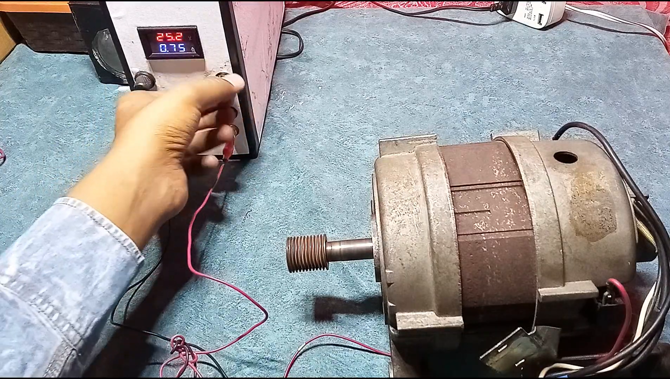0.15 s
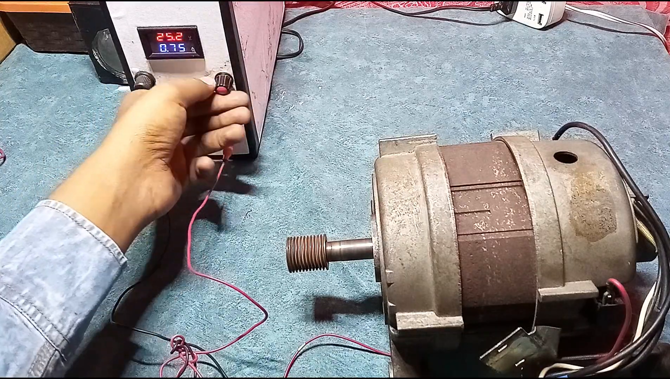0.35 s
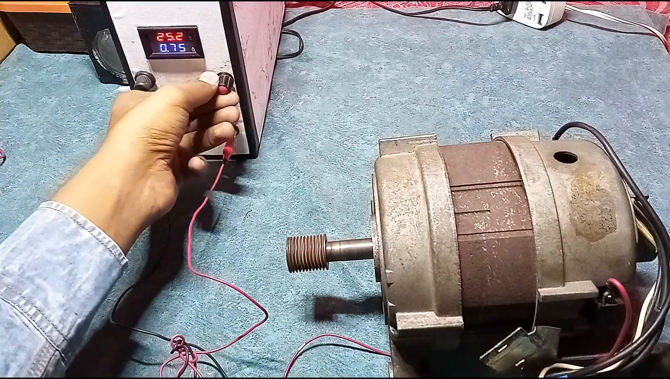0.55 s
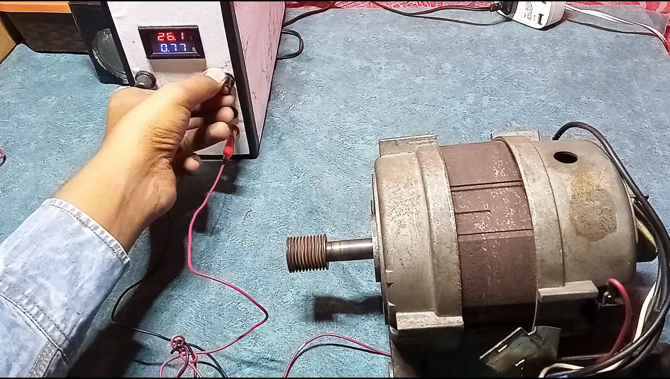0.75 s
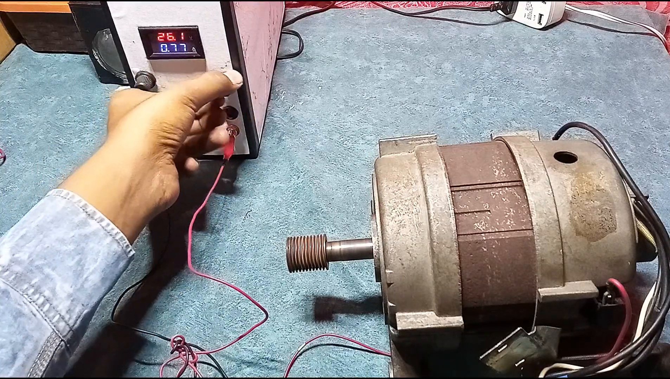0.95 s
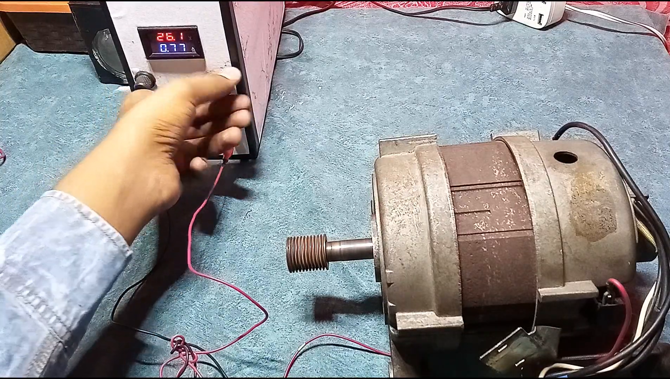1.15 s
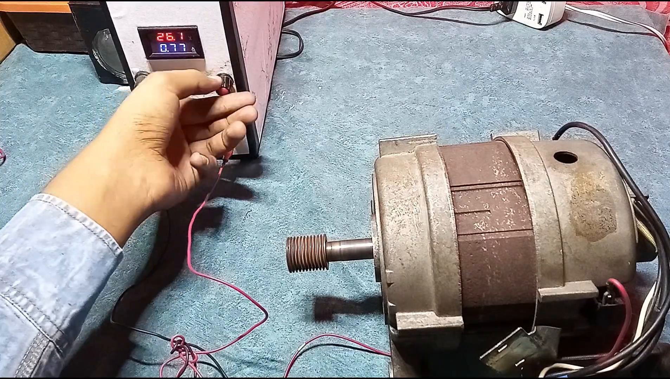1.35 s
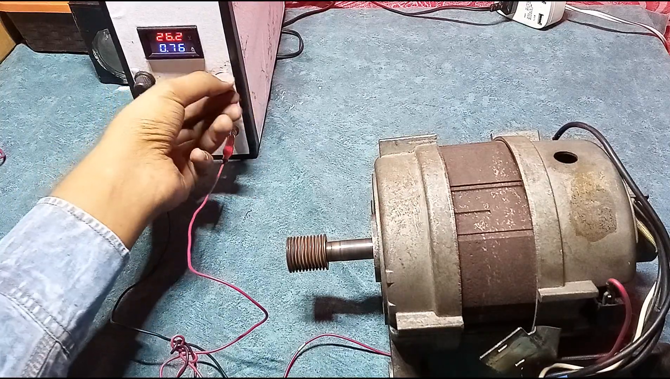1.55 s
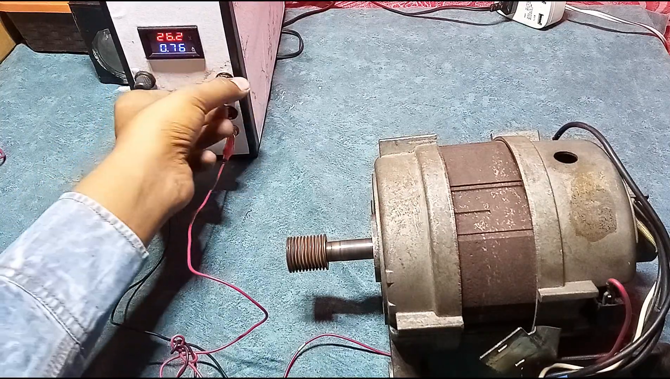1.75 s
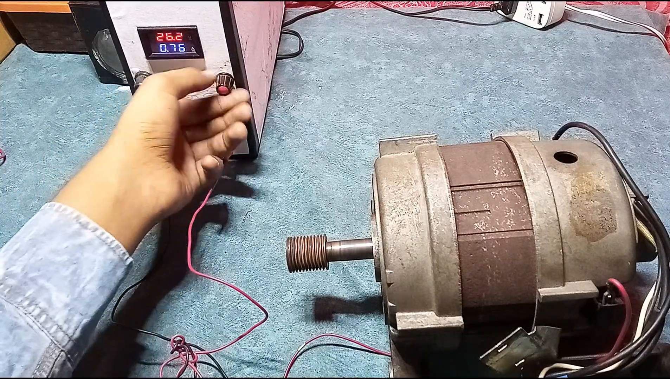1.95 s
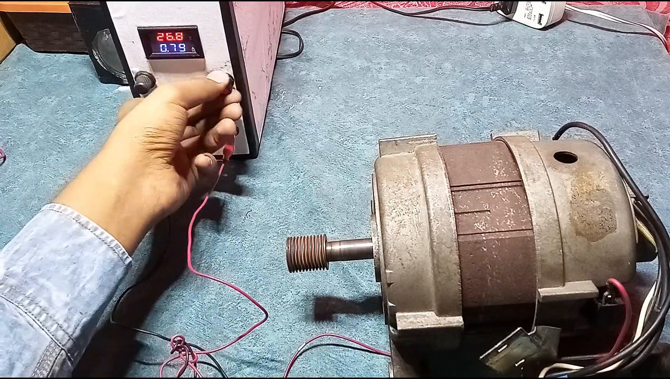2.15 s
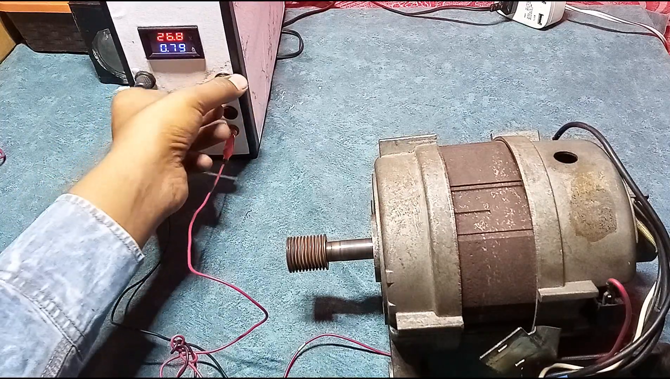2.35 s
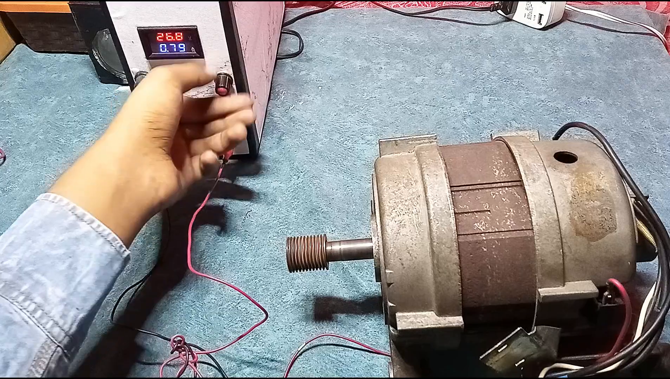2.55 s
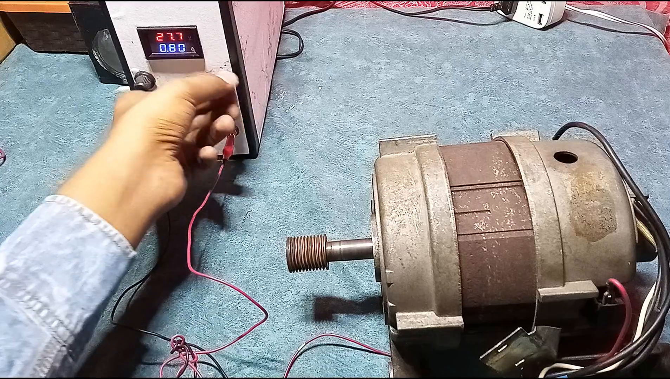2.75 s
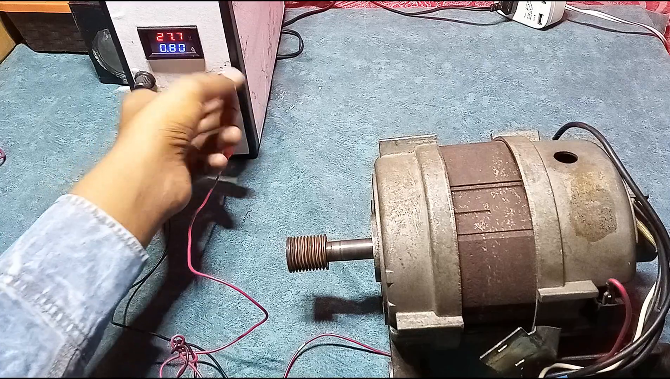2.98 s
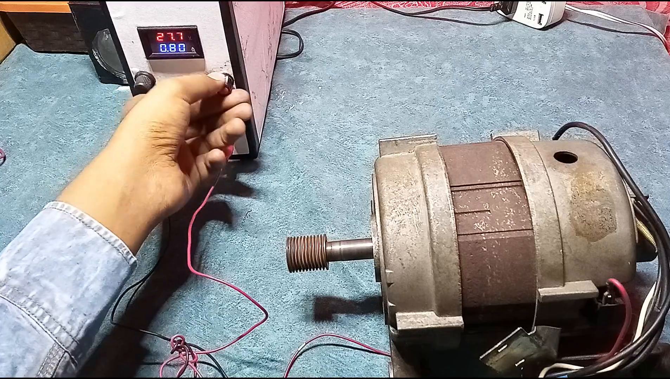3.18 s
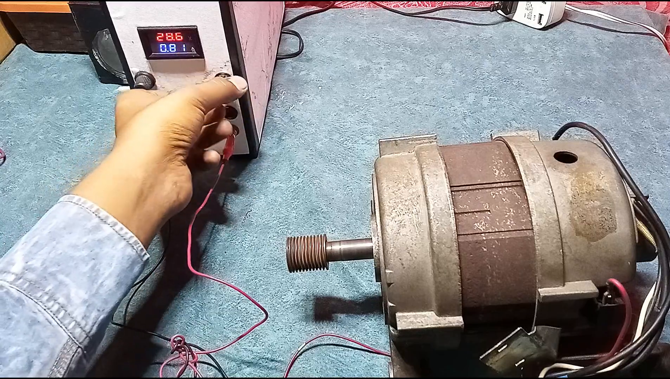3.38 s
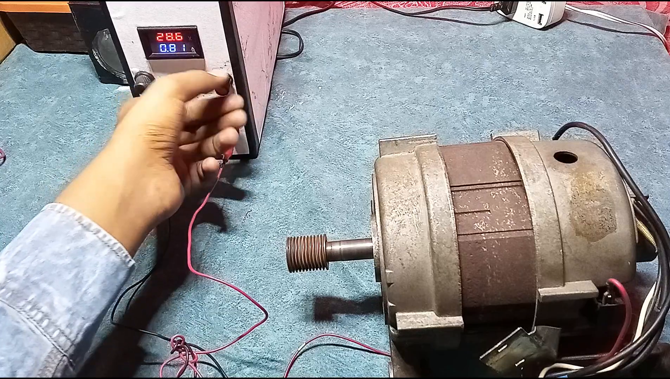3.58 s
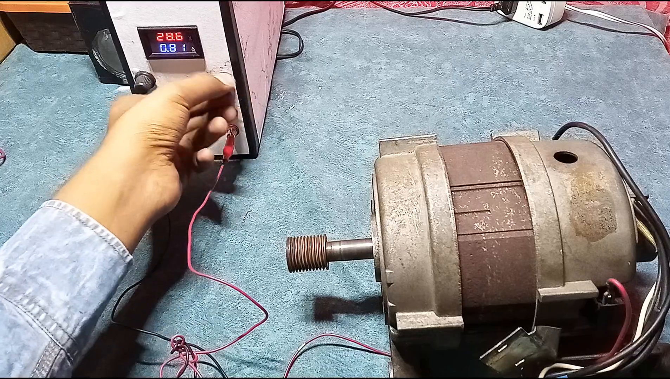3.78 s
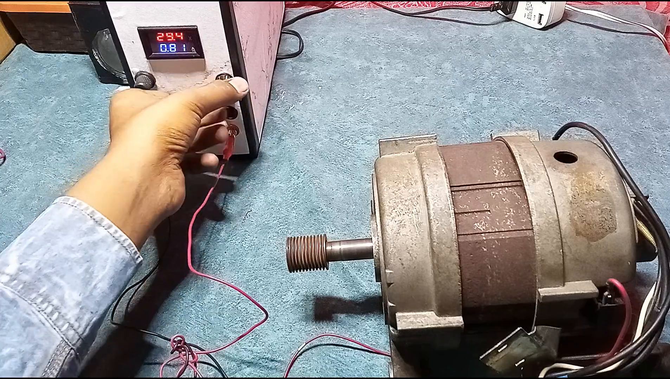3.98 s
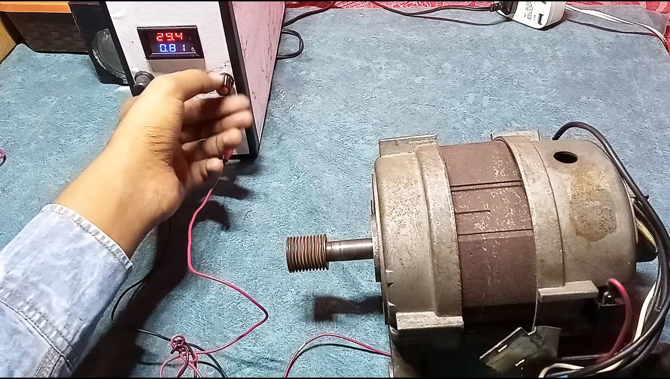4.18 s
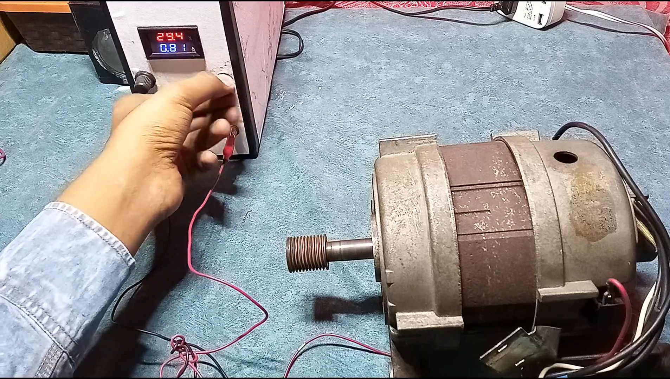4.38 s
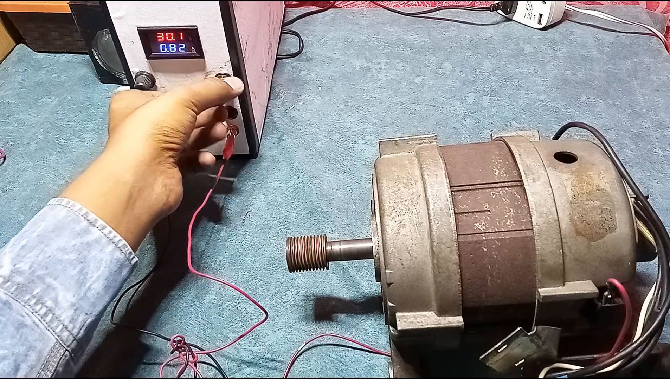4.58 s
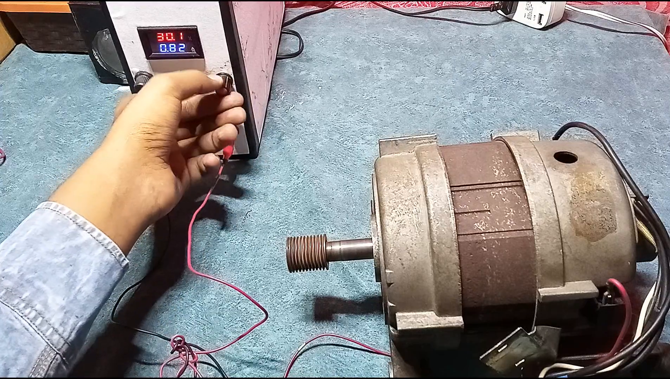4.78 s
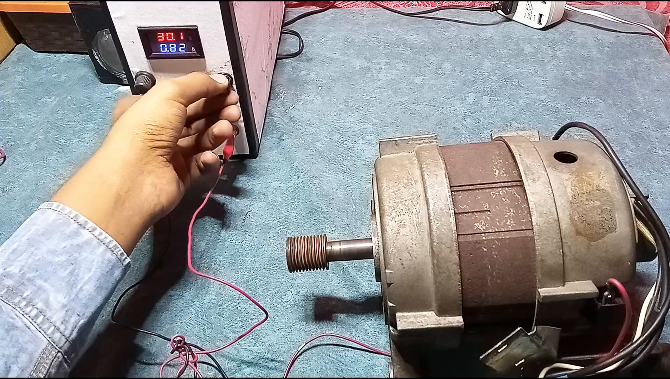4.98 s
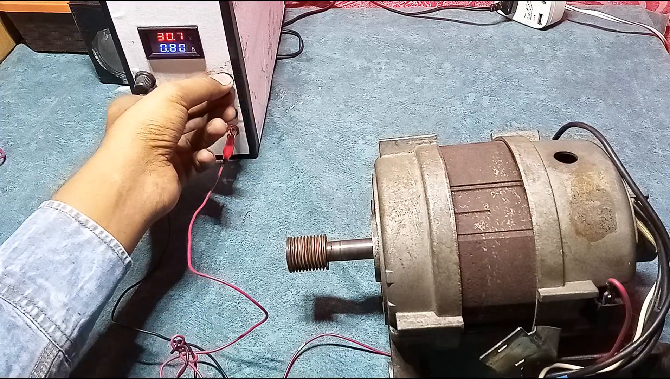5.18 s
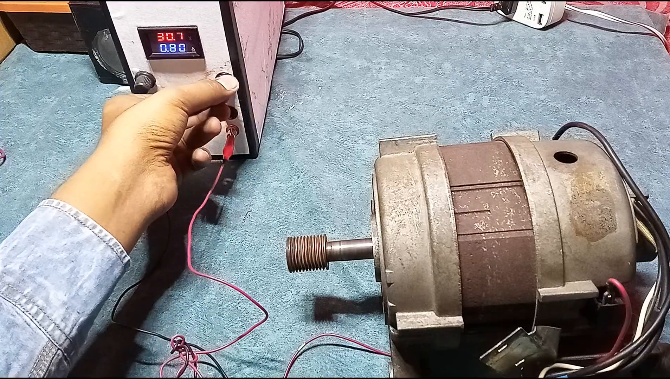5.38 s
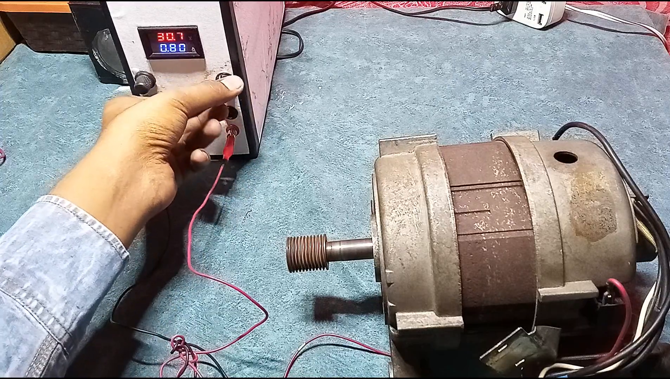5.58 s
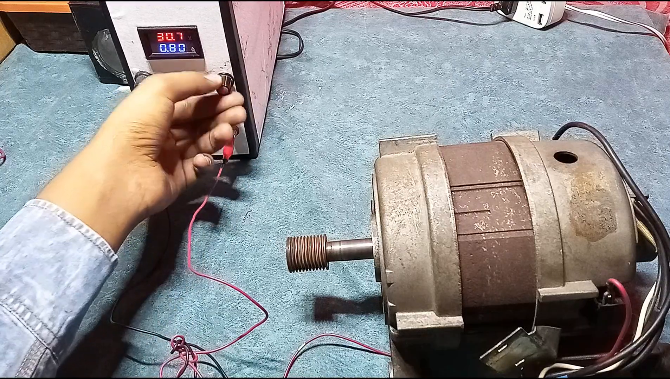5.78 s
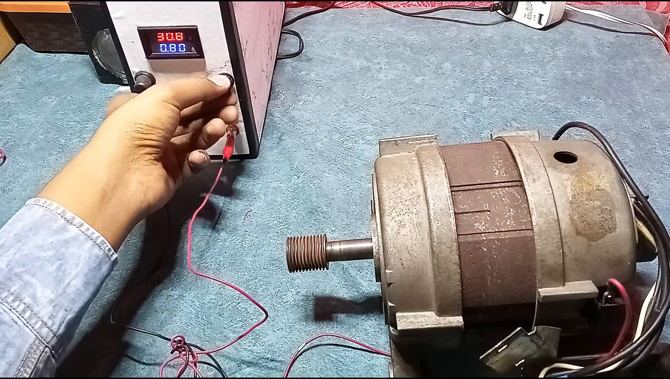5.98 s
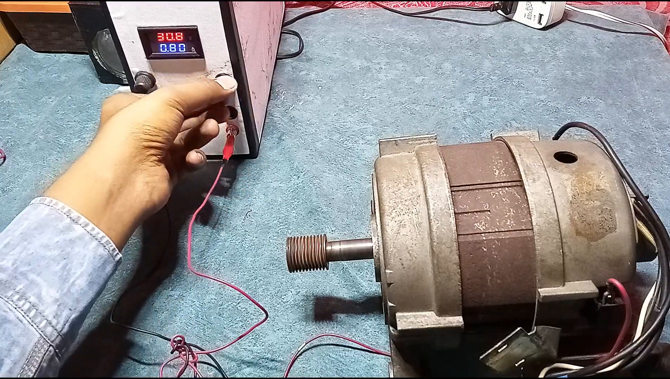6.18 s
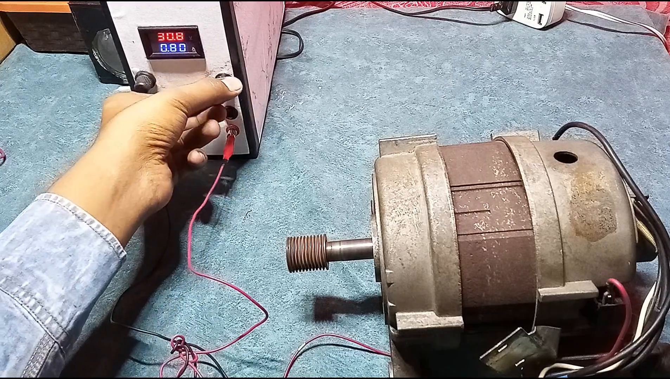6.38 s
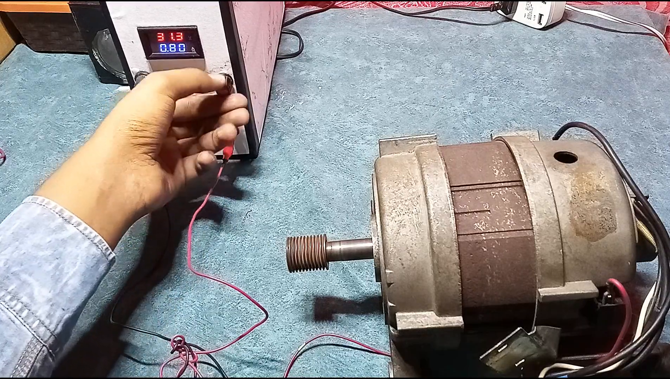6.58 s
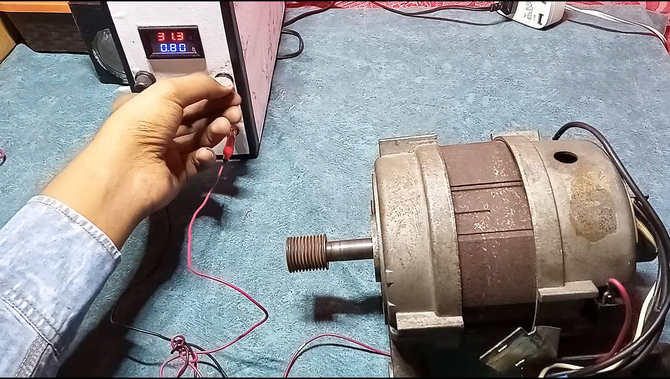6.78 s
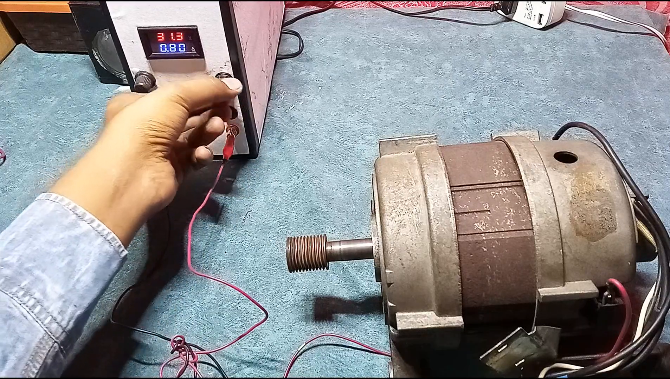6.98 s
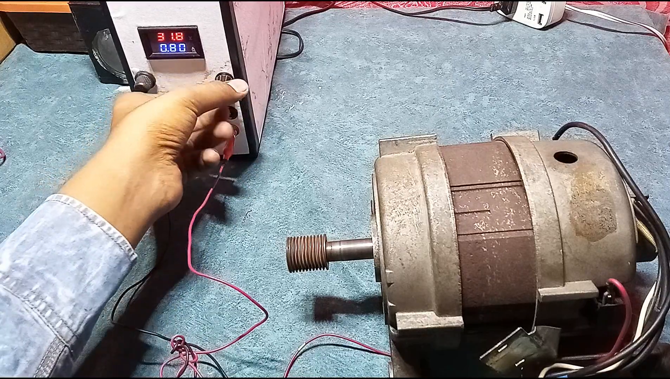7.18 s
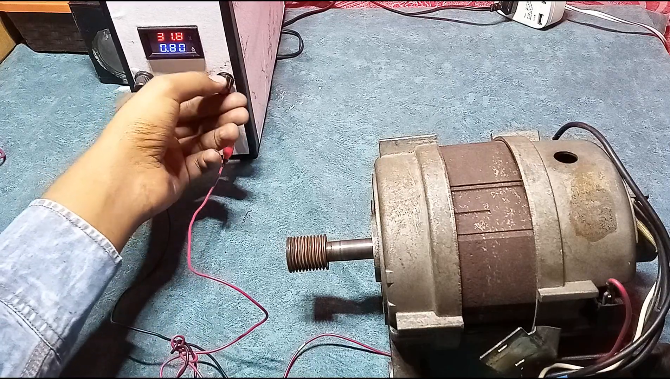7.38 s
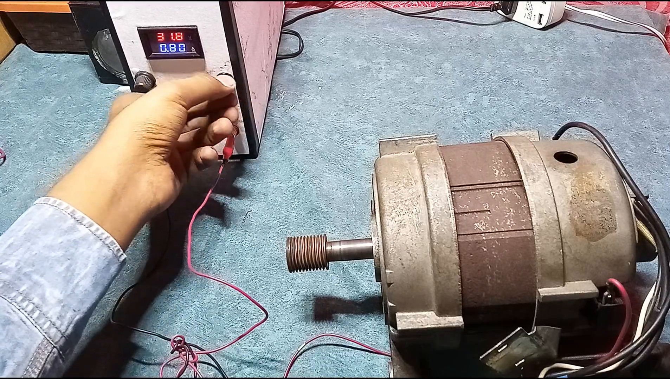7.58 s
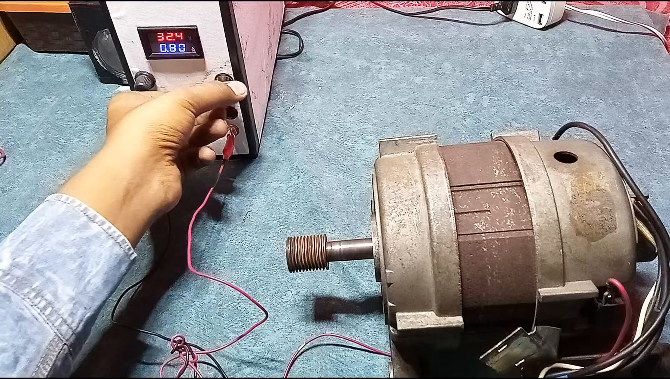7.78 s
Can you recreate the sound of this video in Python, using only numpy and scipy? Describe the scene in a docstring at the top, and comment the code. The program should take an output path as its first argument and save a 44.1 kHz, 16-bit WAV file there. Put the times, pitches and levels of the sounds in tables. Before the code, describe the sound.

A thin whine of several tones comes from a small electric motor running freely on a bench, already spinning at the start. The pitch creeps upward as it gathers speed, joined by a fluttering brush hiss and a high, gritty bearing rattle. The room rumbles faintly behind it. Near the end everything stops dead, with no winding down.

```python
"""A thin whine climbs slowly in pitch: a small brush motor runs unloaded on a cloth-covered bench
while its supply voltage is turned up. Commutator bars and bearing balls sing at fixed multiples of
the shaft speed through the resonances of the cast frame. The brushes hiss, the dry bearing rattles
near 7 kHz and the room rumbles faintly, until the sound is cut off abruptly."""
import sys
import numpy as np
from scipy import signal
from scipy.fft import rfft, irfft
from scipy.io import wavfile

SR = 44100
rng = np.random.default_rng(int(sys.argv[2]) if len(sys.argv) > 2 else 0)


def generate_wav(signal):
    """Clip the signal to [-1, 1] and save it as 16-bit WAV at the path in sys.argv[1]."""
    frames = np.transpose(np.atleast_2d(signal))
    scaled = np.clip(frames, -1, 1) * 32767
    pcm = np.round(scaled).astype(np.int16)
    wavfile.write(sys.argv[1], SR, pcm)


N = 345744
TIME = np.arange(N) / SR
BIN_HZ = np.maximum(np.arange(N // 2 + 1) * SR / N, 1)


def from_db(db):
    """Decibels to gain."""
    return 10 ** (np.asarray(db) / 20)


def unit_rms(x):
    """Scale to unit rms."""
    return x / np.sqrt(np.mean(x ** 2) + 1e-20)


def automation(rows):
    """One curve per value column of a timed table, at every sample."""
    times, *columns = np.transpose(rows)
    return [np.interp(TIME, times, column) for column in columns]


def eq_curve(points):
    """Gain at every frequency bin from (freq_hz, gain_db) points."""
    hz, db = np.transpose(points)
    return from_db(np.interp(np.log(BIN_HZ), np.log(hz), db))


def resonance(hz, width_hz, db=0):
    """Gain of one steep-sided resonance at every frequency bin."""
    return from_db(db) / (1 + (2 * (BIN_HZ - hz) / width_hz) ** 2)


def filtered(x, gain):
    """Filter by a gain per frequency bin."""
    return irfft(rfft(x) * gain, N)


def drift(rate_hz):
    """Random wander with spread 1."""
    knots = rng.standard_normal(1024)
    return np.interp(TIME * rate_hz, np.arange(len(knots)), knots, period=len(knots)) * np.sqrt(3 / 2)


# Tone colour of the room rumble: freq_hz, gain_db
RUMBLE_EQ = [(15, -42), (30, -34), (45, -22), (58, -12), (82, -10), (100, 2.5), (120, -1), (150, -3.5),
             (200, -4.5), (260, -5.5), (320, -18), (420, -31)]
# Fader for the rumble bed between booms: time_s, level_db
RUMBLE_FADER = [(0, -70.5), (1.8, -69), (3, -72), (4.3, -71), (5.3, -69), (7.25, -70.5)]
# Soft booms, where the rumble and a room mode swell: start_s, length_s, gain_db
BOOMS = [(0.218, 0.038, -63.5), (0.439, 0.044, -67.5), (1.425, 0.046, -65), (1.786, 0.08, -61),
         (1.984, 0.25, -62.5), (2.494, 0.064, -61), (2.822, 0.04, -65), (3.546, 0.05, -63.5),
         (4.614, 0.072, -62), (4.925, 0.054, -66.5), (5.033, 0.056, -65), (5.3, 0.048, -62),
         (5.48, 0.108, -63.5), (5.845, 0.054, -63), (6.226, 0.134, -58.5), (6.415, 0.054, -60),
         (6.549, 0.076, -62.5), (7.226, 0.03, -67)]

def room_rumble(lumpy_db, swell_db, boom_db, mode_rest_db, fade_s):
    """Lumpy low noise and one room mode; both rise with each boom."""
    booms = np.zeros(N)
    for start, length, db in BOOMS:
        corners_s = [start - fade_s, start + length / 2, start + length + fade_s]
        booms += from_db(db) * np.interp(TIME, corners_s, [0, 1, 0])
    low_noise = unit_rms(filtered(rng.standard_normal(N), eq_curve(RUMBLE_EQ)))
    mode = unit_rms(filtered(rng.standard_normal(N), resonance(hz=165.5, width_hz=17)))
    steady_mode = unit_rms(np.cos(np.angle(signal.hilbert(mode))))  # envelope flattened
    bed_db = automation(RUMBLE_FADER)[0] + lumpy_db * drift(12)
    bed = from_db(bed_db) * low_noise + from_db(mode_rest_db) * mode
    return bed + booms * (from_db(swell_db) * low_noise + from_db(boom_db) * steady_mode)


# Body resonances of the cast frame and its end shields: centre_hz, width_hz, gain_db
FRAME_MODES = [(382, 160, -30.5), (514.4, 53, -18.5), (610, 91, -17.5), (694, 270, -26.5), (787.5, 47, -18),
               (1021, 124, -20), (1415, 100, -30), (1610, 126, -15.5), (1780, 130, -12.5),
               (1850, 90, -10.5), (2147, 440, -19), (2520, 270, -19), (2548, 120, -14.5), (2728, 130, -12),
               (2870, 170, -13), (3080, 120, -12), (3228, 132, -5), (3350, 110, -6.5), (3594, 260, -14.5),
               (3973, 75, -14.5), (4353, 1200, -15.5), (5383, 190, -14), (6340, 2600, -15.5),
               (6660, 176, -9.5), (7036, 514, -0.5), (7440, 430, -13), (8280, 1600, -15), (9730, 1700, -15),
               (12400, 2600, -27), (15024, 870, -17.5)]

def frame_response(rugged_db, spacing_hz):
    """The frame's main resonances; in the treble, countless small modes make the response rugged."""
    body = np.sqrt(sum(resonance(*mode) ** 2 for mode in FRAME_MODES))
    centres_hz = np.arange(0, SR / 2, spacing_hz)
    ripple = np.interp(BIN_HZ, centres_hz, rng.standard_normal(len(centres_hz)))
    depth_db = rugged_db * np.interp(BIN_HZ, [3500, 5000, 7000, 8500], [0, .7, .3, 1])
    return body * from_db(depth_db * ripple)


# Colour of the brush friction going into the frame: freq_hz, gain_db
HISS_EQ = [(300, 3.5), (600, -9.5), (1100, 2), (1800, -5.5), (2500, -4.5), (3200, -4.5), (4500, 3),
           (6000, -2.5), (7000, -5.5), (8500, 3.5), (12000, 0), (15500, 3.5)]

def brush_hiss(frame, chatter_db):
    """Carbon sliding on copper: hiss that flutters with the contact."""
    sliding = rng.standard_normal(N) * from_db(chatter_db * drift(900))
    return unit_rms(filtered(sliding, frame * eq_curve(HISS_EQ)))


def rough_ring(turns, bumps):
    """A rough ring passing a contact: the same random profile returns on every turn."""
    profile = signal.resample(rng.standard_normal(bumps), bumps * 8)
    return np.interp(turns % 1 * len(profile), np.arange(len(profile)), profile)


# Colour of the rolling noise going into the frame: freq_hz, gain_db
RATTLE_EQ = [(400, -6.5), (1500, -5.5), (3200, -15), (5000, -5.5), (6300, -4), (7000, -2), (8000, -7.5),
             (10000, -3), (15500, -11)]

def bearing_rattle(turns, frame, repeat_db, ball_db, load_db, sideband_db, grit_db):
    """Rolling noise that returns with the cage and pulses as each ball meets an inner race flaw."""
    cage_per_turn, passes_per_turn = .3883, 4.8935
    rolling = from_db(repeat_db) * rough_ring(cage_per_turn * turns, bumps=1500) + rng.standard_normal(N)
    angle = 2 * np.pi * turns
    # the two poles pull on the rotor twice a turn, which also beats with the ball passes
    pressure_db = ball_db * np.cos(passes_per_turn * angle) + load_db * np.cos(2 * angle)
    pressure_db += sideband_db * np.cos((passes_per_turn - 2) * angle)
    rolling *= from_db(pressure_db + grit_db * drift(700) + 0.58 * drift(30))
    return unit_rms(filtered(rolling, frame * eq_curve(RATTLE_EQ)))


# Faders for the two friction layers, ahead of their trims: time_s, rattle_db, hiss_db
FRICTION_FADERS = [(0, -42, -42.5), (.5, -42, -41.5), (1, -44.5, -42), (1.5, -43, -41.5), (2, -39.5, -42.5),
                   (2.5, -46, -39.5), (3, -41.5, -39.5), (3.5, -39.5, -41), (4, -39, -40.5),
                   (4.5, -37, -42), (5, -35, -42.5), (5.5, -37, -40.5), (6, -36, -41.5), (6.5, -36, -40.5),
                   (7.25, -36.5, -39.5)]

def friction(turns, frame):
    """The motor's noise bed: the dry bearing and the brushes, each on its own fader."""
    rattle_db, hiss_db = automation(FRICTION_FADERS)
    rattle = bearing_rattle(turns, frame, repeat_db=-0.5, ball_db=0.5, load_db=2.5,
                            sideband_db=2.0, grit_db=-0.5)
    hiss = brush_hiss(frame, chatter_db=-0.5)
    return from_db(rattle_db - 1.6) * rattle + from_db(hiss_db + 0.63) * hiss


def tone_row(turns, spacing, offset, span, uneven_db, slip_turns, size=8192):
    """Uneven tones whose phase wanders as a contact slips; spacing, offset, span in cycles per turn."""
    orders = np.arange(0, span[1], spacing) + offset
    lead_orders = np.array(WHINE_TONES)[:, 0]
    clear_of_whine = np.abs(orders[:, None] - lead_orders).min(axis=1) > .05
    strength, phase = rng.random((2, len(orders)))
    gains = from_db(uneven_db * (2 * strength - 1)) * clear_of_whine * (orders >= span[0])
    wavetable = size * np.fft.ifft(gains * np.exp(2j * np.pi * phase), size)
    slipped = turns + slip_turns * drift(6)
    row = np.interp(spacing * slipped % 1 * size, np.arange(size), wavetable)
    return np.sqrt(2) * np.real(row * np.exp(2j * np.pi * offset * slipped))


# Colour of the brush buzz going into the frame: freq_hz, gain_db
BUZZ_EQ = [(4500, -43), (6500, -48.5), (8500, -44.5), (10500, -44), (13500, -41), (16000, -43)]

def brush_buzz(turns, speed, trim_db, doubling_db, uneven_db, slip_turns):
    """Two opposite brushes ride one copper profile, so only even multiples sound; louder with speed."""
    drive_db = trim_db + doubling_db * np.log2(speed / speed.mean())
    row = tone_row(turns, spacing=2, offset=0, span=(72, 268), uneven_db=uneven_db, slip_turns=slip_turns)
    return from_db(drive_db) * filtered(row, eq_curve(BUZZ_EQ))


# Flaws of the inner race, outer race and ball: passes_per_turn, sideband_cycles_per_turn, gain_db
BEARING_FLAWS = [(4.8935, 1, 1.5), (3.1065, .3883, -1), (4.0835, .3883, -1)]
# Colour of the bearing hum going into the frame: freq_hz, gain_db
HUM_EQ = [(500, -46), (1000, -52), (1500, -45), (2400, -46.5), (3300, -47.5), (4100, -45.5), (5200, -54.5),
          (6500, -46.5), (7500, -50.5)]

def bearing_hum(turns, trim_db, sideband_db, uneven_db, slip_turns):
    """Each flaw hums at multiples of its pass rate, with a sideband on either side."""
    hum = np.zeros(N)
    for passes, sideband, db in BEARING_FLAWS:
        for side in (-1, 0, 1):
            row = tone_row(turns, spacing=passes, offset=side * sideband, span=(8, 120),
                           uneven_db=uneven_db, slip_turns=slip_turns)
            hum += from_db(db + sideband_db * abs(side)) * row
    return from_db(trim_db) * filtered(hum, eq_curve(HUM_EQ))


# Narrow peaks and notches of the frame on the bench: centre_hz, width_hz, gain_db
PEAKS_AND_NOTCHES = [(406, 7, 16.1), (540, 13, -8.0), (581, 18, 2.3), (612, 3, -4.7), (629, 3, -12.1),
                     (665, 42, 7.8), (672, 20, -12.2), (771, 22, 9.9), (808, 35, 25.5), (992, 23, 23.1),
                     (1028, 9, 16.1), (1064, 31, 24.9), (1627, 32, 12.2), (1665, 58, -17.0),
                     (1769, 24, 13.8), (1813, 19, 15.3), (1855, 17, 17.3), (1973, 87, -16.0),
                     (2126, 24, 3.0), (2219, 14, -12.0), (2326, 36, -14.0), (2413, 14, 5.9),
                     (2733, 25, 16.0), (3227, 85, 22.0), (3330, 66, 17.5), (3380, 29, 14.2),
                     (3643, 51, 8.2), (4047, 15, 3.0), (5427, 100, 7.9)]
# Lead voices, from the commutator bars (18, 36, 90 per turn) and the races and balls (the rest):
# cycles_per_turn, gain_db, coupling_ratio (to the peaks and notches: 0 none, 1 normal)
WHINE_TONES = [(5.893, -81.1, 1.0), (8.16, -69.7, 0.8), (9.787, -54.3, 1.2), (11.84, -78.1, 0.9),
               (12.64, -81.0, 0.7), (13.681, -84.0, 1.1), (15.53, -82.9, 1.0), (15.681, -78.6, 1.0),
               (16.69, -82.6, 0.9), (18, -62.5, 0.0), (18.63, -82.0, 1.1), (28.368, -59.1, 0.7),
               (36, -50.1, 1.3), (39.17, -58.7, 1.3), (48.93, -65.9, 0.8), (53.86, -68.6, 0.8),
               (58.77, -70.8, 1.0), (63.66, -63.6, 1.3), (90, -60.6, 1.0)]

def motor_whine(turns, speed, trim_db, waver_db):
    """Tones locked to the shaft; each swells or fades as its pitch sweeps through a peak or notch."""
    response_db = sum(db * resonance(hz, width_hz) for hz, width_hz, db in PEAKS_AND_NOTCHES)
    whine = np.zeros(N)
    for order, db, coupling in WHINE_TONES:
        swell_db = coupling * np.interp(order * speed, BIN_HZ, response_db)
        gain = from_db(db + trim_db + swell_db + waver_db * drift(25))
        whine += gain * np.sin(2 * np.pi * (order * turns + rng.random()))
    return np.sqrt(2) * whine


# The shaft's slow run-up, which sets every motor pitch: time_s, speed_turns_per_s
RUN_UP = [(0.0, 54.798), (0.25, 55.207), (0.5, 55.7), (1.0, 56.633), (2.0, 58.321), (2.5, 59.306),
          (3.0, 60.43), (4.5, 63.974), (4.75, 64.449), (5.0, 65.135), (5.5, 66.076), (6.0, 67.05),
          (6.5, 67.922), (7.0, 68.873), (7.25, 69.32)]

def shaft():
    """Speed and running count of turns as the voltage rises; the turns carry a slight flutter."""
    speed = automation(RUN_UP)[0]
    turns = np.cumsum(speed * (1 + .0002 * drift(12))) / SR
    return speed, turns


def scene():
    """All parts of the motor follow one shaft, over the room rumble; both channels are the same."""
    speed, turns = shaft()
    frame = frame_response(rugged_db=2.8, spacing_hz=90)
    hum = bearing_hum(turns, trim_db=0.35, sideband_db=-4.5, uneven_db=3.0, slip_turns=.0005)
    buzz = brush_buzz(turns, speed, trim_db=-2.0, doubling_db=16.5, uneven_db=5.5, slip_turns=.0001)
    whine = motor_whine(turns, speed, trim_db=0.56, waver_db=1.06)
    motor = whine + filtered(hum + buzz, frame) + friction(turns, frame)
    room = room_rumble(lumpy_db=2.5, swell_db=-7.5, boom_db=0.5, mode_rest_db=-75.5, fade_s=0.033)
    return np.tile(motor + room, (2, 1))


def record(dry):
    """The sound stops dead, and a steep low-pass takes off the very top."""
    stop_s, cutoff_hz = 7.2512, 15800
    low_pass = signal.ellip(12, .1, 90, cutoff_hz, fs=SR, output="sos")
    return signal.sosfilt(low_pass, dry * (TIME < stop_s))


dry = scene()
out = record(dry)
generate_wav(out)
```